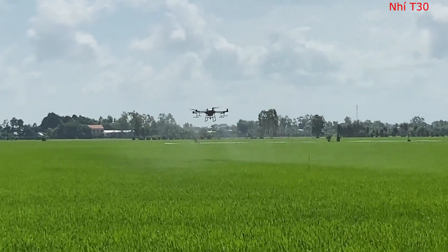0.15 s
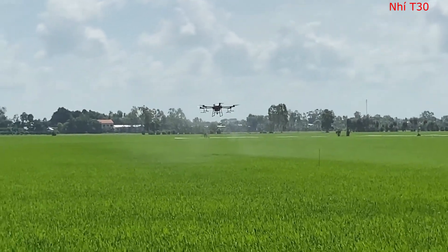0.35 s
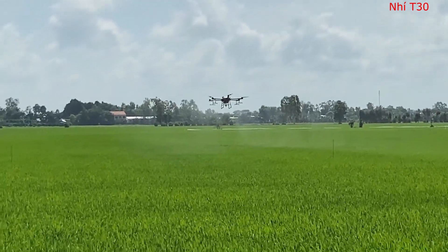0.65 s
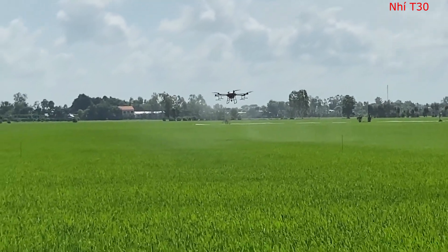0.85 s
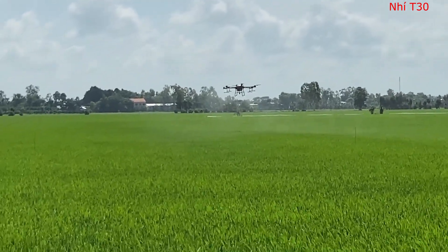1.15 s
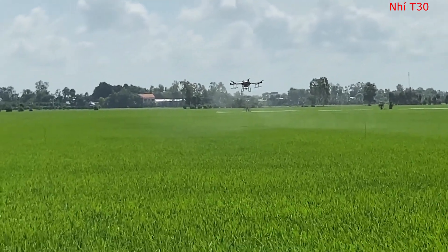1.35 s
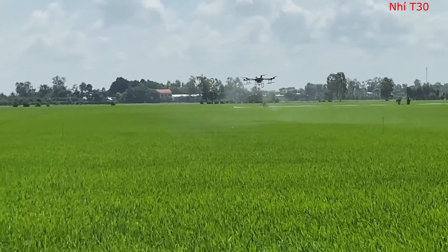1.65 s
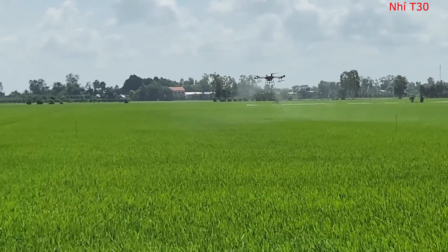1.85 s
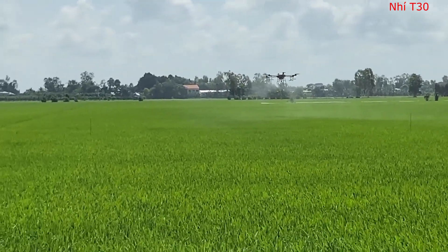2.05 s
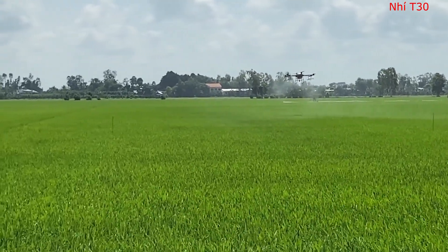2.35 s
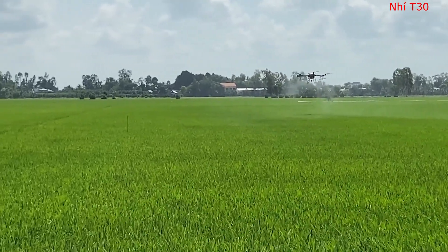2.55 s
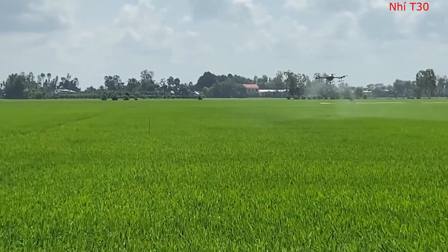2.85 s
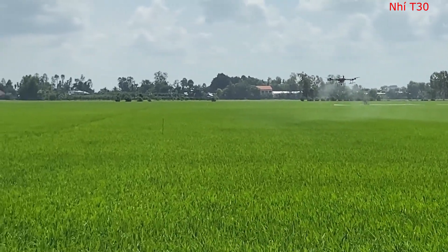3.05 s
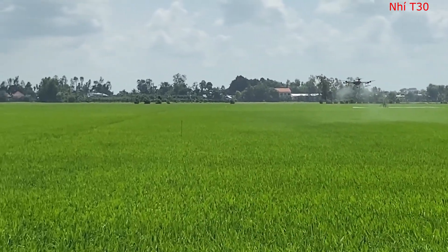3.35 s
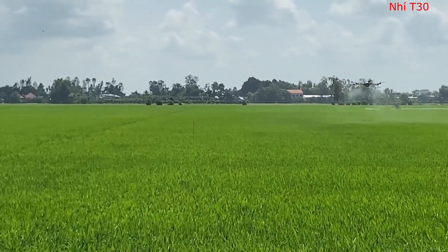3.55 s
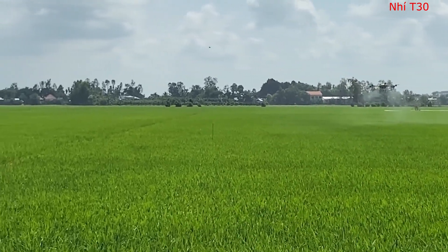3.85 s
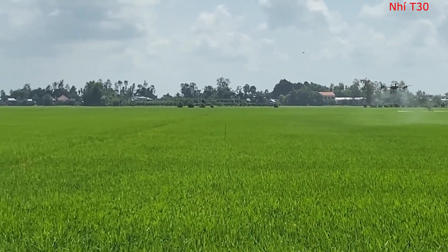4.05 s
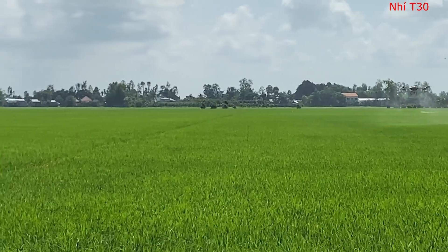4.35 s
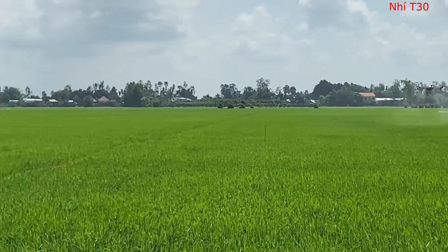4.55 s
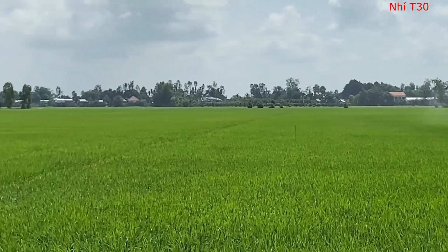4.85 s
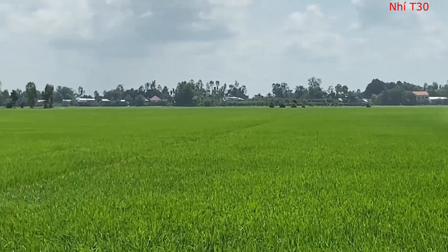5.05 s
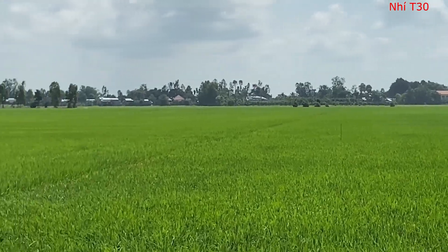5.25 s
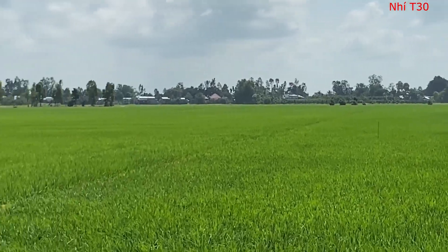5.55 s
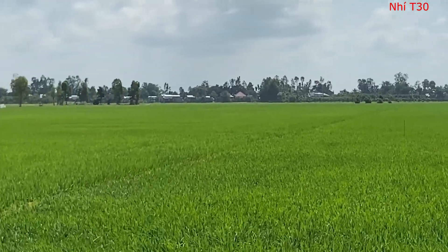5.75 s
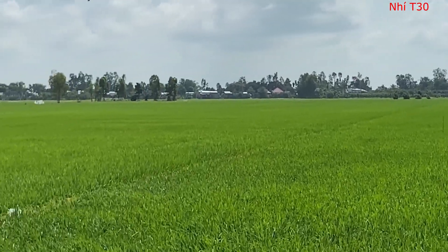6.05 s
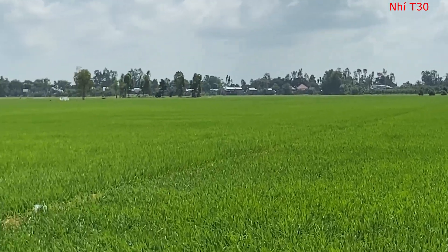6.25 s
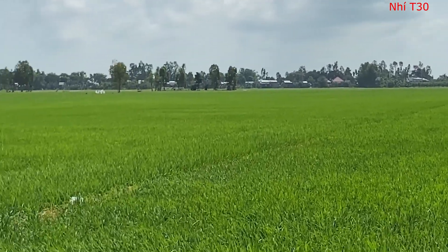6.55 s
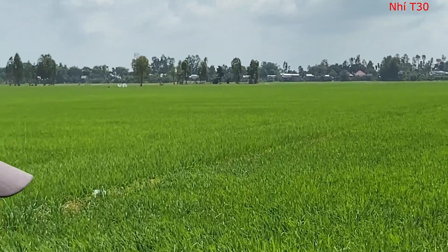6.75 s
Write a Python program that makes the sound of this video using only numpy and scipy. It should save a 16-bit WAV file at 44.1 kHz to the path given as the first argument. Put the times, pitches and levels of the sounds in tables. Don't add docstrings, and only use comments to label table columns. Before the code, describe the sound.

A rapid engine drone of about thirty firings a second dominates throughout, rough and rattling, each firing a tiny metallic knock and puff of hiss. A distant multi-rotor drone whirs ahead, strongest early, then fades. Irregular deep wind buffets bump the stereo phone microphone. Open field, no echo; as the phone swings, the exhaust hum eases and the casing clatter comes forward.

```python
import sys
import numpy as np
from scipy import signal
from scipy.fft import rfft, irfft, next_fast_len
from scipy.io import wavfile

SR = 44100
rng = np.random.default_rng(int(sys.argv[2]) if len(sys.argv) > 2 else 0)


def pcm_store(signal):
    levels = np.round(np.clip(np.atleast_2d(signal), -1, 1) * 32767)
    wavfile.write(sys.argv[1], SR, levels.astype(np.int16).T)


def nominal_scale(level):
    x = np.asarray(level, float) / 20
    return 10 ** x


N = 303849
HZ = np.maximum(np.fft.rfftfreq(next_fast_len(N), 1 / SR), 1)


# (multiple of the firing rate, level/dB rms)
HUM_ORDERS = [(1, -58), (2, -42), (3, -41.5), (4, -41), (5, -37), (6, -38), (7, -30.5), (8, -42.5),
              (9, -41.5), (10, -30), (11, -37.5), (12, -48.5), (13, -43), (14, -46.5), (15, -51),
              (16, -52.5), (17, -46), (18, -48.5), (19, -61), (20, -49), (21, -70.5), (22, -52.5),
              (23, -55), (24, -55), (25, -52), (26, -47), (27, -55), (28, -61), (29, -57), (30, -61)]
STROKES = [
    (4, .31, -.092, 1),
    (6, .35, -.092, 1),
    (9, .347, 0, -1),
    (12, .330, 0, -1),
    (30, .082, .052, 1),
]


def hum(cycles, waver_db):
    order, level_db = np.transpose(HUM_ORDERS)
    tail_db = level_db[-1] - 0.7 * np.arange(1, 99)
    slope_db = np.r_[level_db[0] - 10, level_db, tail_db]
    cepstrum = irfft(np.log(nominal_scale(slope_db)))
    cepstrum[129:] = 0
    ringing = 2 * rfft(cepstrum).imag[1:31]
    coarse_cycles = cycles[::8]
    out = 0
    for k, db, phase in zip(order, level_db, ringing):
        last, moment, earlier, sign = next(row for row in STROKES if k <= row[0])
        waver = k * k * waver_db * drift(2.45, size=8)
        since_stroke = coarse_cycles - moment + earlier * k / 2
        out += sign * nominal_scale(db + waver) * np.cos(2 * np.pi * k * since_stroke + phase)
    return np.sqrt(2) * full_rate(out)


# (f/Hz, level/dB, t60/s)
CASING_PANELS = [(800, -34.5, 0.074), (1123, -42.5, 0.033), (1494, -38.5, 0.095), (1816, -41.5, 0.033),
                 (2043, -33.5, 0.023), (2506, -42.5, 0.04), (2734, -37.5, 0.041), (2940, -44, 0.036),
                 (4493, -39, 0.026), (6500, -43.5, 0.019)]


def knocks(cycles, spread_db):
    knock_at, jitter_s = 0.0302, 0.0003
    at = np.flatnonzero(np.diff(np.floor(cycles - knock_at)))
    jitter = (rng.normal(0, 1, len(at)) * jitter_s * SR).astype(int)
    at = np.clip(at + jitter, 0, N - 1)
    blow = rng.normal(0, 1, len(at))
    out = np.zeros(N)
    for hz, db, t60 in CASING_PANELS:
        clicks = np.full(N, 1e-18)
        clicks[at] = nominal_scale(db + spread_db * (blow + rng.normal(0, 1, len(at))))
        r = nominal_scale(-60 / (t60 * SR))
        w = 2 * np.pi * hz / SR
        out += signal.lfilter([0, np.sin(w)], [1, -2 * r * np.cos(w), r * r], clicks)
    return out


# (f/Hz, level/dB per Hz)
HISS = [(130, -72.5), (250, -65.5), (400, -71), (600, -81), (800, -61.5), (1100, -63.5), (1500, -64.5),
        (2700, -66.5), (3250, -76.5), (4600, -74), (7000, -77.5), (9000, -77.5), (11000, -88.5),
        (15500, -88)]
# (f/Hz, depth/dB, loudest moment/cycles)
THROB = [(200, 1.5, 0.073), (800, 2, 0.06), (2000, 2.5, 0.017), (4840, 1.18, 0.24), (11000, 1.5, 0.29)]


def puffs(cycles, clatter_db, treble_db, uneven_db, patchy_db):
    strength = np.interp(cycles, np.arange(220) - 0.3, rng.normal(0, 1, 220))
    white = rng.standard_normal((2, 2, N))
    edges = 110 * 2 ** np.arange(0, 7.4, 1 / 3)
    out = 0
    for k, (low, high) in enumerate(zip(edges, edges[1:])):
        hz = np.sqrt(low * high)
        angle = 2 * np.pi * (cycles - at_hz(THROB, hz, column=2))
        swell = np.cos(angle) - 0.28 * np.sin(2 * angle)
        throb_db = at_hz(THROB, hz) * (swell + uneven_db * strength)
        turn_db = treble_db if hz > 3000 else clatter_db
        level_db = at_hz(HISS, hz) + turn_db + throb_db + patchy_db * drift(11.0)
        band_filter = signal.butter(2, [low, high], "band", fs=SR, output="sos")
        out = out + nominal_scale(level_db) * signal.sosfilt(band_filter, white[k % 2])
    return out * np.sqrt(SR / 2)


# (multiple of the firing rate, level/dB rms)
WHINE_ORDERS = [(35, -49), (37, -58), (38, -52.5), (39, -53), (41, -53.5), (45, -51), (48, -51),
                (59, -50.5), (60, -56), (66, -66), (68, -55.5)]


def whine(cycles, waver_db):
    angle = 2 * np.pi * cycles[::8]
    out = 0
    for k, db in WHINE_ORDERS:
        level = nominal_scale(db + waver_db * drift(1.6, size=8))
        out = out + level * np.sin(k * angle + 0.89 * drift(5.8, size=8))
    return np.sqrt(2) * full_rate(out)


# (t/s, firings per s)
CRANK_SPEED = [(0.0, 30.756), (0.45, 30.589), (0.7, 30.711), (1.3, 30.561), (1.65, 30.651), (2.3, 30.636),
               (2.5, 30.741), (3.95, 30.825), (4.15, 30.523), (4.65, 30.587), (5.5, 30.448), (5.75, 30.718),
               (5.95, 30.589), (6.89, 30.647)]
# (t/s, share of the swing 0-1)
PHONE_SWING = [(0, 0.03), (1.0, 0.1), (2.5, 0.41), (4.9, 0.5), (6.0, 0.82), (6.89, .98)]


def engine():
    cycles = np.cumsum(in_time(CRANK_SPEED)[0]) / SR
    swing = in_time(PHONE_SWING)[0] - 0.5
    hum_db, clatter_db, treble_db = -2.6 * swing, 2.5 * swing, -3 * swing
    steady = nominal_scale(hum_db) * hum(cycles, waver_db=0.0018)
    struck = nominal_scale(clatter_db) * (knocks(cycles, spread_db=2.0) + whine(cycles, waver_db=3.0))
    hiss = puffs(cycles, clatter_db - 1.86, treble_db - 0.7, uneven_db=0.26, patchy_db=0.6)
    return hiss + steady + struck


# (f/Hz, level/dB)
LEFT_SHADE = [(60, 8), (110, 4.5), (200, -2.5), (380, 1.5), (700, -4), (1290, -6), (2380, 0.5), (4400, 0),
              (8120, 2), (15000, 0.0)]
# (f/Hz, share 0-1)
ALIKE = [(300, 1), (650, 0.6), (1200, 0.79), (2500, 0.81), (3500, 0.88)]
# (f/Hz,
# wave cycles late)
LEFT_LAG = [(0, 0), (306, .21), (430, .255), (800, .455), (1200, .48), (1500, .71), (1900, .855),
            (2500, .94), (3500, 1),
            (7550, 1), (7620, 1.13), (9000, 1.5), (9400, 1.5), (10800, 2), (11650, 2), (11750, 2.13),
                 (13150, 2.5), (13750, 2.5), (13880, 2.66), (14950, 3)]


def ports(near, scattered):
    treble = HZ > 3400
    alike = np.where(treble, 1, np.clip(at_hz(ALIKE, HZ), 0, 1))
    shade = np.where(treble, 1, nominal_scale(at_hz(LEFT_SHADE, HZ) / 2))
    lag_cycles = np.interp(HZ, *np.transpose(LEFT_LAG))
    left = shaped(near, shade * np.exp(-2j * np.pi * lag_cycles))
    right = shaped(near, np.sqrt(alike) / shade)
    right = right + shaped(scattered, np.sqrt(1 - alike) / shade)
    return np.array([left, right])


# (t/s, level/dB)
ROTOR_WASH = [(0, -41.5), (2.5, -41.5), (5, -44.5), (6.89, -59)]
# (f/Hz, level/dB)
WASH_COLOUR = [(150, -2), (500, -3), (1000, -8.5), (2000, -11.5), (4000, -14.5), (7000, -45), (8000, -110)]
# (t/s, blade passes per s, level/dB of the strongest tone)
BLADES = [(0, 109, -50), (.7, 110, -46), (1.5, 109.5, -43), (2.1, 109.5, -44), (2.5, 107, -48),
          (3.2, 104, -53), (4.5, 103, -56), (6.89, 103, -58)]
# (multiple of the blade rate, level/dB)
BLADE_TONES = [(4, -13), (5, -7.5), (7, -2), (8, -9), (9, -7.5), (10, -9)]


def rotors():
    wash = rms_one(shaped(rng.standard_normal(N), nominal_scale(at_hz(WASH_COLOUR, HZ))))
    out = wash * nominal_scale(in_time(ROTOR_WASH)[0] + 1.8 * drift(2.7))
    rate, tone_db = in_time(BLADES)
    for trim in (-0.004, 0.004):
        speed = rate * (1 + trim + 0.00212 * drift(1.7))
        passes = np.cumsum(speed)[::8] / SR
        tones = sum(nominal_scale(db) * np.sin(2 * np.pi * k * passes + k * k) for k, db in BLADE_TONES)
        out += nominal_scale(tone_db + 1.2 * drift(1.8)) * full_rate(tones)
    return out


# (t/s, level/dB, f/Hz)
THUMPS = [(0.017, -22, 69), (0.186, -24, 70.0), (0.325, -23, 105), (0.955, -20, 75), (1.254, -26, 67.4),
          (2.006, -17, 54.7), (2.088, -21, 70.0), (2.145, -34, 62), (2.295, -21, 62), (2.465, -27, 60),
          (2.598, -14, 76.4), (2.755, -23, 70), (2.815, -6, 77), (2.982, -17, 80.7), (3.115, -26, 60),
          (3.267, -13, 65.3), (3.359, -22, 112.6), (3.519, -28, 59.2), (3.665, -11.5, 71.4),
          (3.798, -29, 53.8), (3.925, -25, 84), (4.568, -25, 60), (5.119, -14, 66.7), (5.175, -20, 67.3),
          (5.265, -21, 85), (5.445, -24, 65), (5.509, -18, 75.4), (5.608, -16, 104), (5.734, -15, 100),
          (6.429, -25, 61.4)]
# (f/Hz, level/dB)
WIND_COLOUR = [(20, -39), (40, -6.5), (58, 0.5), (85, -4), (130, -18), (200, -50), (400, -51), (1500, -130)]


def wind(lumpy_db, own):
    shared, left, right = shaped(rng.standard_normal((3, N)), nominal_scale(at_hz(WIND_COLOUR, HZ)))
    separate = np.array([left * nominal_scale(4.0 * drift(4.3)), right * nominal_scale(6.4 * drift(5.9))])
    rumble = shared + own * separate
    rumble = rms_one(rumble * nominal_scale(lumpy_db * drift(21))) * gusting()
    t = np.arange(6000) / SR
    for s, db, hz in THUMPS:
        since = t * hz
        swell = since * np.exp(1 - since / 0.72)
        buffet = nominal_scale(db - 2.5) * swell * np.sin(12 * since ** 0.5 + since)
        at = round((s + 0.01423) * SR)
        rumble[:, at:at + len(t)] += buffet * [[1.1], [0.9]]
    return rumble


# (start t/s, held/s, level/dB)
GUSTS = [
    (-0.15, 0.14, -21.5),
    (2.1, 0.72, -27.5),
    (3.24, 0.63, -30),
    (4.2, 0.3, -32),
    (5.1, 0.6, -27),
]


def gusting():
    breeze_db, rise_s, fall_db_per_s = -36, 0.052, 37
    t = np.arange(N) / SR
    power = nominal_scale(breeze_db) ** 2
    for s, held, db in GUSTS:
        rise = np.clip((t - s) / rise_s, 0, 1)
        fall_db = fall_db_per_s * np.maximum(t - s - held, 0)
        power = power + (rise * nominal_scale(db - fall_db)) ** 2
    return np.sqrt(power)


def rms_one(x):
    return x / np.sqrt(np.mean(x ** 2) + 1e-20)


def in_time(rows):
    s, *columns = np.transpose(rows)
    return [np.interp(np.arange(N) / SR, s, c) for c in columns]


def at_hz(points, hz, column=1):
    table = np.array(points)
    return np.interp(np.log(hz), np.log(table[:, 0]), table[:, column])


def shaped(x, response):
    size = next_fast_len(N)
    return irfft(rfft(x, size) * response, size)[..., :N]


def drift(rate, size=1):
    r = np.exp(-80 * np.pi * rate / SR)
    noise = rng.standard_normal(N // 40 + 2002)
    slow = signal.lfilter([1], [1, -2 * r, r * r], noise)[2000:]
    return np.interp(np.arange(0, N, size) / 40, np.arange(len(slow)), rms_one(slow - slow.mean()))


def full_rate(coarse):
    return signal.resample_poly(coarse, 8, 1)[:N]


def scene():
    return ports(*engine()) + rotors() + wind(lumpy_db=1.5, own=0.21)


def low_pass(x):
    return signal.sosfilt(signal.butter(12, 15860, fs=SR, output="sos"), x)


def record(dry):
    mix = shaped(dry, HZ < 15800)
    return low_pass(mix)


dry = scene()
out = record(dry)
pcm_store(out)
```